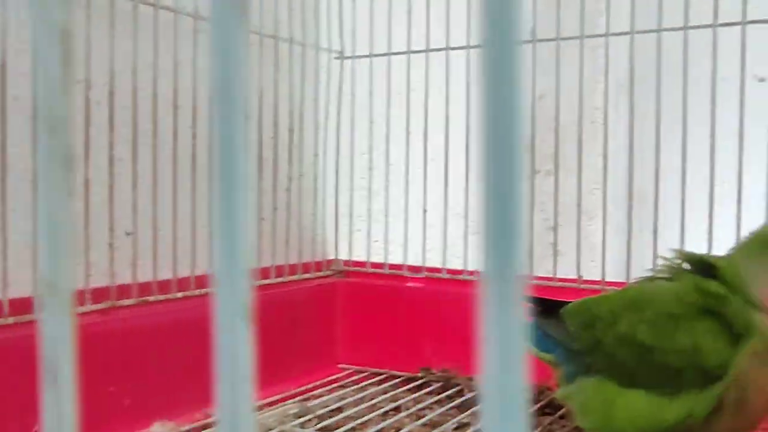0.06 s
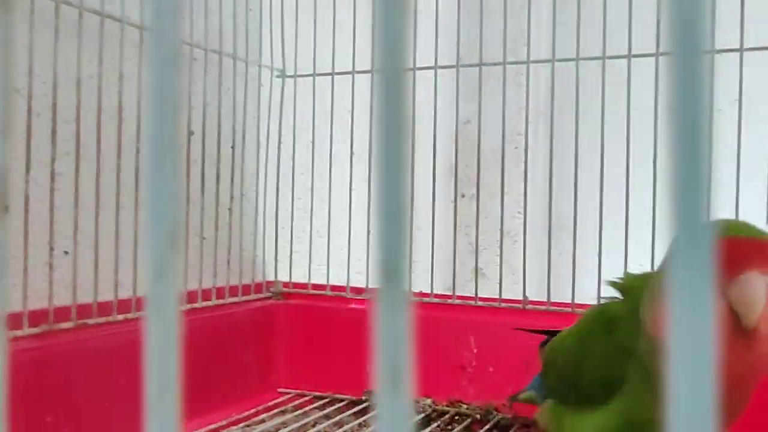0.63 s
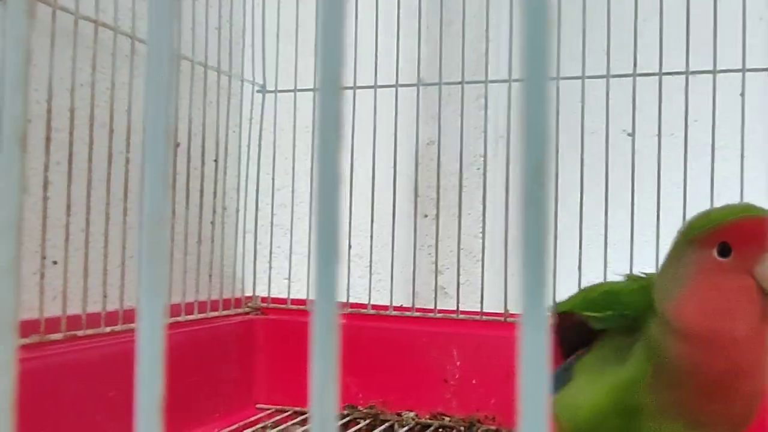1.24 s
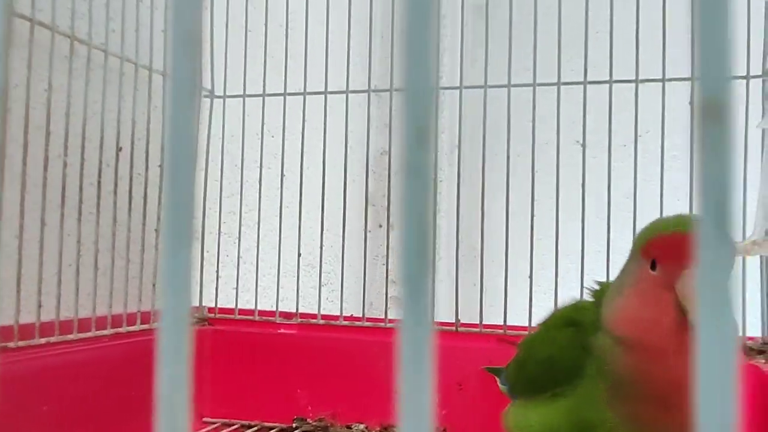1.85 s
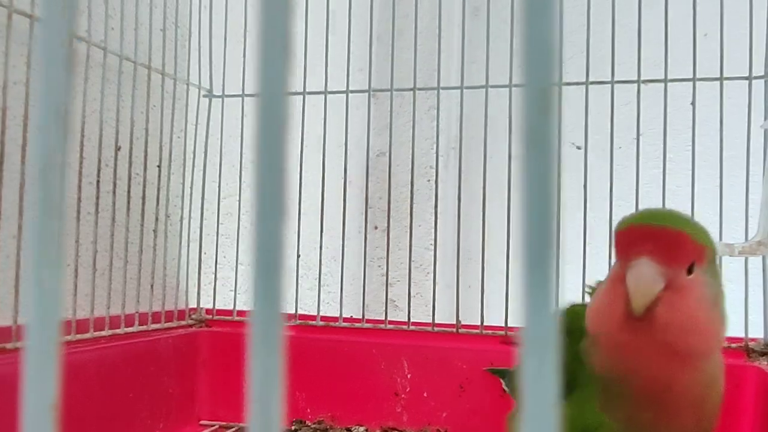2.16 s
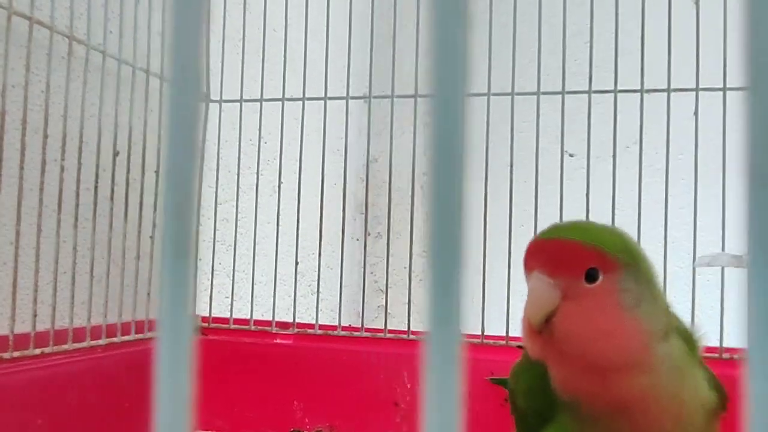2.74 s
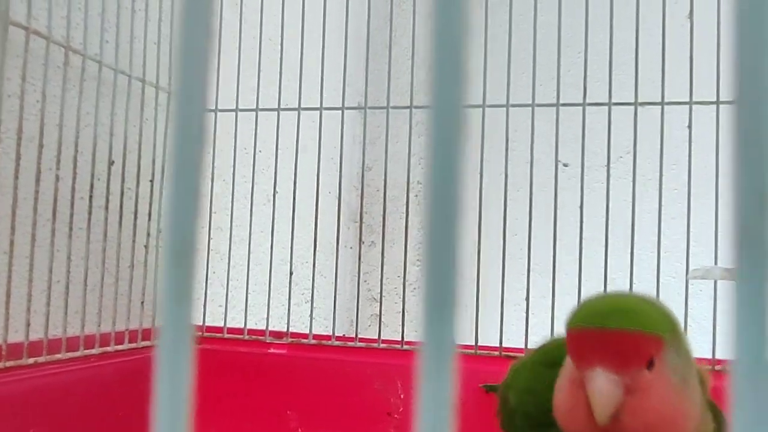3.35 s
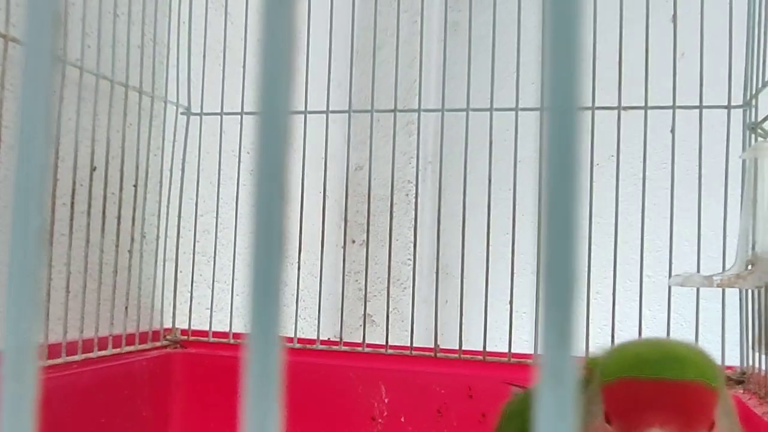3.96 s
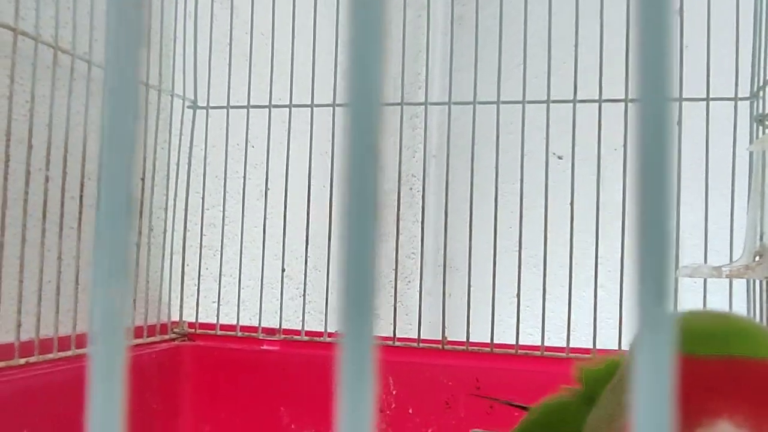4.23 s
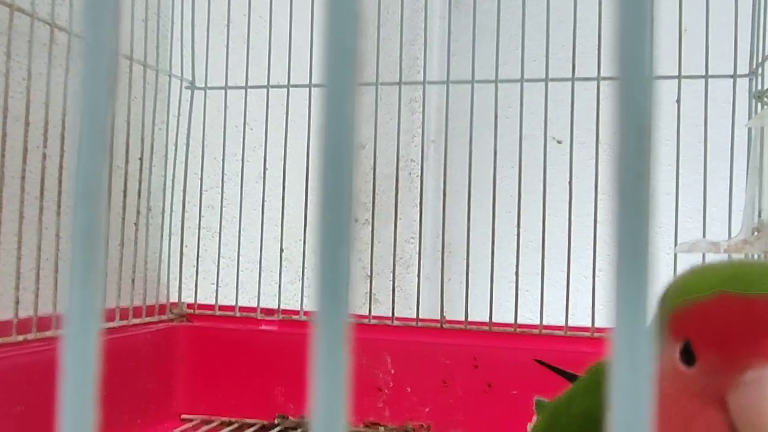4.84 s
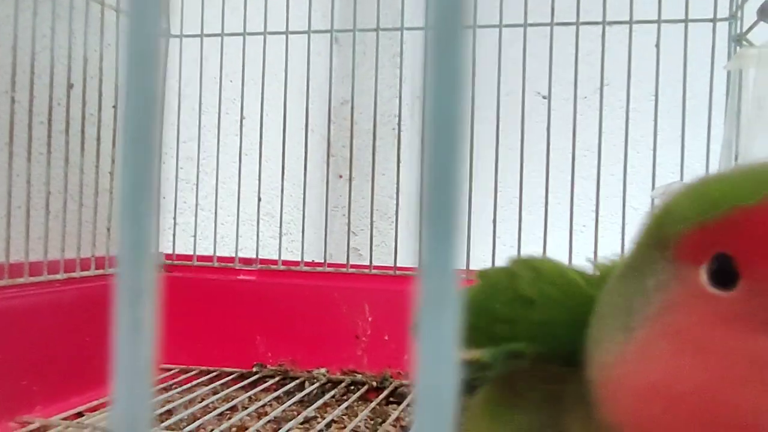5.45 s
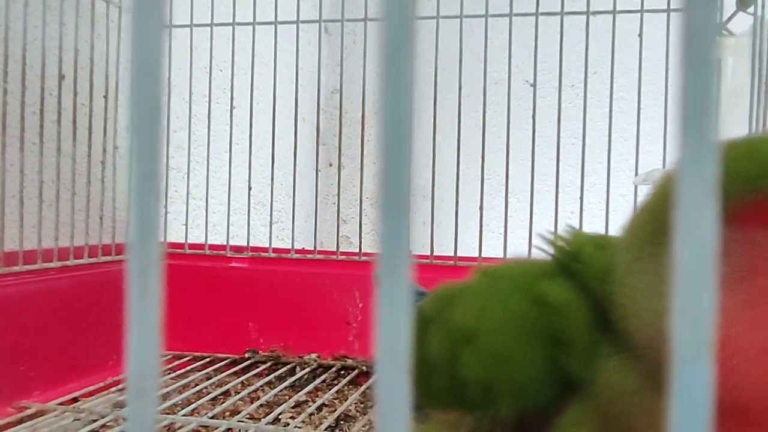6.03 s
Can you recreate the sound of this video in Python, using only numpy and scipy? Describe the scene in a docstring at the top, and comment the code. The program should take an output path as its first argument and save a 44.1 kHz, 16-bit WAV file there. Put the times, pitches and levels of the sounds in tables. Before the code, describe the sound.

A hard clack rings briefly on a wire cage. Right after it, a lovebird gives one loud, shrill two-syllable chirp very close to the microphone, slightly distorted, with a short echo from a hard-walled room. The rest is much quieter: the phone softly bumps and scuffs the bars, while claws tick on wire, small footfalls sound on a plastic tray and feathers rustle over a low rumble of air.

```python
"""A lovebird chirps at close range

A caged lovebird gives one shrill two-syllable chirp beside a phone, in a hard-walled room. In each
syllable its syrinx jumps from a rasp to a whistle; the call overloads the microphones and reverberates.
A clack comes just before it. Afterwards the phone bumps and scuffs the bars, while claws tick on the
wire, footfalls ring the tray and feathers rustle over a low rumble of air."""
import sys
import numpy as np
from scipy import signal
from scipy.fft import rfft, irfft, next_fast_len
from scipy.io import wavfile
from scipy.ndimage import uniform_filter1d, minimum_filter1d

SR = 44100
rng = np.random.default_rng(int(sys.argv[2]) if len(sys.argv) > 2 else 0)


def waveform_to_disk(signal):
    """Save audio, clipped to [-1, 1], as 16-bit WAV at the path in sys.argv[1]."""
    frames = np.transpose(np.atleast_2d(signal))
    scaled = np.clip(frames, -1, 1) * 32767
    samples = np.round(scaled).astype(np.int16)
    wavfile.write(sys.argv[1], SR, samples)


N = 268524
TIME = np.arange(N) / SR

# Reverberation time of the room: frequency_hz, t60_s
ROOM_DECAY = [(200, .45), (1000, .5), (2500, .53), (6000, .54), (9000, .46), (12500, .42), (16000, .35)]
# Ambient noise: frequency_hz, level_db
AIR_SPECTRUM = [(12, -28.5), (20, 10), (44, -12.5), (81, -10), (127, -16.5), (198, -19.5), (262, -24.5),
                (388, -26.5), (607, -30), (698, -29), (1290, -34.5), (5680, -45), (8890, -54), (13900, -43),
                (16000, -50.5)]
# Likeness of that noise at the two microphone ports: frequency_hz, correlation
AIR_COHERENCE = [(30, 0.31), (200, 0.33), (1000, .25), (8000, .05)]
# Movements of the bird: start_s, level_db, t60_s
SHUFFLE_EVENTS = [(.39, -56.5, 0.32), (1.219, -62.5, 4.4), (3.77, -58, 1.1), (4.209, -55, 0.97),
                  (4.99, -64.5, 0.68)]
# Rustle of feathers and litter: frequency_hz, level_db
SHUFFLE_SPECTRUM = [(80, -10.5), (150, 6), (260, -1), (480, 6.5), (900, -11), (1500, -10.5), (2600, -17),
                    (4200, -26), (8500, -36.5), (15000, -22)]
# Footfalls on the floor grid: start_s, level_db
FOOTFALLS = [(1.235, -56), (2.299, -65), (3.08, -66.5), (3.63, -57.5), (3.784, -58.5), (4.04, -59.5),
             (4.225, -63), (4.44, -59.5), (5.008, -59), (5.403, -69)]
# Resonances of the hollow plastic tray: frequency_hz, bandwidth_hz, gain_db
TRAY_MODES = [(148, 15, -2.5), (400, 19, 6.5), (512, 27, 5.5), (760, 53, -7), (1380, 290, -25)]
# Claws and beak on the wire: start_s, level_db, left_minus_right_db
WIRE_TAPS = [(0.394, -56.5, -4), (1.2343, -55, -7), (1.254, -55.5, -9), (1.345, -55.5, -10),
             (2.139, -51.5, -3.5), (2.267, -52, -5), (2.5386, -52.5, -2.5), (2.9699, -54.5, -0.5),
             (3.397, -50.5, -1), (4.042, -55.5, 3), (4.1344, -58, -2), (4.2262, -54.5, -9),
             (5.009, -51.5, -1), (5.0464, -58, -6), (5.402, -56, 0), (5.7009, -53, 1)]
# One such tap: frequency_hz, level_db
TAP_SPECTRUM = [(300, -2), (1000, -1), (2200, 0), (3500, -3.5), (6000, -2), (8500, -9.5), (12000, -7.5),
                (16000, 0)]
# Cage parts ringing after a knock: start_s, pitch_hz, level_db, t60_s
CAGE_RINGS = [(0.103, 375, -53.5, 0.78), (0.104, 1058, -40, 0.39), (0.106, 1794, -38.5, 0.52),
              (3.464, 3810, -67, 0.4), (3.786, 2480, -58, 0.125)]
# The phone's case slides along a bar: start_s, length_s, hiss_db, grating_db
CASE_SLIDES = [(1.479, .018, -61, -56.5), (1.582, 0.018, -57.5, -61), (1.594, 0.036, -67.5, -61.5),
               (1.652, 0.068, -52.5, -69), (1.708, 0.066, -51.5, -59), (1.825, 0.023, -54.5, -46.5),
               (3.463, 0.032, -59, -55), (3.544, 0.012, -61.5, -55), (3.713, 0.035, -55.5, -48)]
# Fine slips in a slide: frequency_hz, level_db
HISS_SPECTRUM = [(1000, 1), (2500, -2.5), (6500, -5), (8500, -12.5), (11000, -3.5), (13500, 1.5),
                 (16000, 3)]
# Coarse slips in a slide: frequency_hz, level_db
GRATING_SPECTRUM = [(80, 19.5), (200, 16), (500, 14.5), (1000, 4), (2500, -7.5), (6000, -16), (12000, -21)]
# The case bumps the bars: start_s, thud_db, click_db, cutoff_hz
CASE_IMPACTS = [(0.037, -53, -43, 1070), (0.665, -35, -68, 1500), (0.703, -55, -65, 800),
                (1.022, -43, -72.5, 510), (1.029, -42, -71, 498), (1.037, -45.5, -70, 500),
                (1.16, -41, -67, 605), (1.171, -41.5, -60, 810), (1.348, -48.5, -69, 900),
                (1.4882, -36.5, -29.5, 1300), (1.583, -36, -56, 900), (1.6588, -39, -56, 1300),
                (1.8206, -41, -18.5, 3440), (3.464, -47, -40, 4900), (3.5475, -40, -36, 2800),
                (3.6127, -40, -30, 1480), (3.7149, -46.5, -31.5, 9180)]
# Modes of the case: frequency_hz, level_db, t60_s
CASE_MODES = [(86, -16, 0.043), (180, -5.5, 0.0217), (288.6, -1, 0.0195), (426, -19, 0.0089)]
# Response of a port to sound carried through the case: frequency_hz, gain_db
PORT_RESONANCE = [(500, -0.5), (1200, 5), (3000, -0.5), (6000, -3), (8500, -12), (12500, 6), (16000, 15)]
# A hard clack across the room: frequency_hz, level_db
CLACK_SPECTRUM = [(150, -50.5), (250, -24.5), (367, -10), (510, -23), (547, -19.5), (1010, -7), (1400, -7),
                  (1790, -1), (1950, -4.5), (6470, -14), (8400, -24.5), (16000, -23)]
# Turbulence in the bird's throat: frequency_hz, level_db
BREATH_SPECTRUM = [(1000, -41), (2000, -32.5), (2400, -8.5), (3000, -14), (3900, -20), (4800, -7.5),
                   (5500, -16), (6200, -4.5), (7200, -17.5), (8200, -20.5), (9800, -10.5), (11100, -11),
                   (12500, 6.5), (15500, -8.5)]
# Rasp that opens each syllable: start_s, length_s, pitch_hz, level_db, release_db_per_s
RASP_NOTES = [(0.461, .018, 2175, -1.5, 901), (0.533, .008, 2355, -7.5, 352)]
# Whistle that ends each syllable: start_s, length_s, pitch_hz, level_db
WHISTLE_NOTES = [(0.477, .052, 6413, -1.5), (0.539, 0.033, 6181, 6.5)]
# Reflections from surfaces near the bird: left_delay_ms, right_delay_ms, gain_db
EARLY_REFLECTIONS = [(1.13, 1.62, -12), (2.9, 4.4, -8.5), (5.399, 6.7, -6)]
# Radiation into the room relative to that aimed at the phone: frequency_hz, gain_db
ROOM_RADIATION = [(1500, -8.5), (2400, 0), (3200, -6.5), (4800, -1), (5500, -5.5), (6200, -6), (7300, -8),
                  (9700, -2.5), (11100, -2.5), (12500, -6.5), (14000, -6), (16000, -14)]
# Response of the right port relative to the left: frequency_hz, gain_db
RIGHT_PORT_RESPONSE = [(2000, -2), (6300, 1.5), (9500, 5), (12500, 3.5), (16000, 2.5)]


def undb(db):
    """Decibels to amplitude ratio."""
    return 10 ** (np.asarray(db) / 20)


def unit(x):
    """Normalisation to rms 1."""
    return x / np.sqrt(np.mean(x ** 2))


def at_bins(curve, size):
    """Log-frequency interpolation of a curve at the bins of a spectrum."""
    hz, value = np.transpose(curve)
    bin_hz = np.arange(size // 2 + 1) * SR / size
    return np.interp(np.log(bin_hz + 1), np.log(hz), value)


def colour(x, curve):
    """Zero-phase filtering by a curve of frequency_hz, gain_db."""
    size = next_fast_len(N)
    return irfft(rfft(x, size) * undb(at_bins(curve, size)), size)[..., :N]


def noise(spectrum):
    """Coloured noise of rms 1, uncorrelated left and right."""
    return unit(colour(rng.standard_normal((2, N)), spectrum))


def butter(x, hz, kind="low", order=2):
    """Causal low- or high-pass filtering."""
    return signal.sosfilt(signal.butter(order, hz, kind, fs=SR, output="sos"), x)


def wander(hz):
    """Random modulation: low-passed noise of rms 1."""
    return unit(butter(rng.standard_normal(N), hz))


def pan(db):
    """Gains for a level difference, left minus right."""
    return undb(np.array([[db], [-db]]) / 2)


def delay(x, ms):
    """Propagation delay."""
    return np.interp(TIME - ms / 1000, TIME, x)


def phase_of(hz):
    """Phase as the integral of frequency."""
    return 2 * np.pi * np.cumsum(hz) / SR


def fade(start, t60):
    """Exponential decay from a sudden onset."""
    return (TIME >= start) * undb(-60 * np.maximum(TIME - start, 0) / t60)


def rise(start, rise_s):
    """Linear onset from 0 to 1."""
    return np.clip((TIME - start) / rise_s, 0, 1)


def note(start, length, attack_s, release_db_per_s):
    """Envelope of attack, hold and exponential release."""
    return rise(start, attack_s) * undb(-release_db_per_s * np.maximum(TIME - start - length, 0))


def reverberation(x, build_s=.016):
    """A diffuse field builds up, then decays by absorption, the high treble first."""
    hz, age, cells = signal.stft(rng.standard_normal((2, SR)), SR, nperseg=256)
    t60 = np.interp(hz, *np.transpose(ROOM_DECAY))[:, None]
    envelope = undb(-60 * age / t60) * (1 - np.exp(-age / build_s))
    tail = signal.istft(cells * envelope, SR)[1]
    response = unit(tail) / np.sqrt(tail.shape[1])
    return signal.fftconvolve(np.atleast_2d(x), response, axes=1)[:, :N]


def air(level_db=-54.5, swell_db=1):
    """Partial coherence: ambient rumble is more alike at the two ports than the faint hiss is."""
    size = next_fast_len(N)
    coherence = at_bins(AIR_COHERENCE, size)
    weights = np.sqrt([1 + coherence, 1 - coherence])
    mid, side = irfft(rfft(noise(AIR_SPECTRUM), size) * weights, size)[:, :N]
    ambience = np.array([mid + side, mid - side]) / np.std(mid)
    return ambience * undb(level_db + swell_db * wander(2))


def shuffles(rise_s=.022, fidget_db=-71):
    """Friction noise of feathers and litter: each movement adds in power to a constant faint fidget."""
    moves = sum(undb(db) * fade(start, t60) * rise(start, rise_s) for start, db, t60 in SHUFFLE_EVENTS)
    return pan(2) * noise(SHUFFLE_SPECTRUM) * np.hypot(moves, undb(fidget_db))


def steps(t60=.488, rise_s=.0093):
    """Resonance: light footfalls excite the modes of the hollow tray."""
    scrape = rng.standard_normal((2, N))
    tray = sum(undb(db) * signal.lfilter(*signal.iirpeak(hz, hz / width, SR), scrape)
               for hz, width, db in TRAY_MODES)
    return unit(tray) * sum(undb(db) * fade(start, t60) * rise(start, rise_s) for start, db in FOOTFALLS)


def ticks(t60=.034, room_db=-6):
    """Impact noise: claws and beak tap the wire in short broadband bursts."""
    envelope = sum(pan(pan_db) * undb(db) * fade(start, t60) for start, db, pan_db in WIRE_TAPS)
    taps = noise(TAP_SPECTRUM) * envelope
    return taps + undb(room_db) * reverberation(taps)


def pings(split=.029):
    """Beating: a struck wire swings in two planes at slightly different frequencies."""
    out = np.zeros((2, N))
    for start, hz, db, t60 in CAGE_RINGS:
        for ratio in (1 - split / 2, 1 + split / 2):
            phase = 2 * np.pi * hz * ratio * TIME + rng.uniform(0, 2 * np.pi, (2, 1))
            out += undb(db) * fade(start, t60) * np.sin(phase) / 2
    return out


def scuffs(grain_db=3, spread=.83, pan_db=-26.5):
    """Sliding friction of case on bar: a hiss of fine slips over a coarser grating."""
    hiss, grating = (unit(n[0] + spread * n) for n in (noise(HISS_SPECTRUM), noise(GRATING_SPECTRUM)))
    out = np.zeros((2, N))
    for start, length, hiss_db, grating_db in CASE_SLIDES:
        span = slice(int(start * SR), int((start + length) * SR))
        pressure = np.sin(np.linspace(0, np.pi, span.stop - span.start))
        friction = undb(hiss_db) * hiss[:, span] + undb(grating_db) * grating[:, span]
        out[:, span] += pan(pan_db) * pressure * friction
    return out * unit(undb(grain_db * wander(600)))


def bumps(detune=.74, pan_db=-20.5):
    """Structure-borne sound: a pulse and the case's damped modes, struck beside the right port."""
    out = np.zeros((2, N))
    age = TIME[:4096]
    for start, thud_db, click_db, cutoff_hz in CASE_IMPACTS:
        grip = 1 + detune * rng.uniform(-.69, 1, (2, 1))  # the hand detunes each end of the case
        modes = sum(undb(db - 60 * age / t60) * np.sin(2 * np.pi * hz * grip * age)
                    for hz, db, t60 in CASE_MODES)
        thud = butter(modes, cutoff_hz)  # a soft contact rounds the thud too
        click = butter(1. * (age == 0), cutoff_hz, order=1)
        first = int(start * SR)
        out[:, first:first + len(age)] += pan(pan_db) * (2 * undb(click_db) * click - undb(thud_db) * thud)
    return colour(out, PORT_RESONANCE)


def clack(start=.1045, level_db=-12.5, direct_db=-21, room_db=-16):
    """Direct and reverberant sound of a hard impact across the room."""
    blow = noise(CLACK_SPECTRUM) * undb(level_db)
    direct = blow * fade(start, t60=.46)
    reflected = reverberation(blow * fade(start, t60=.023), build_s=.0012)
    return pan(1) * (undb(direct_db) * direct + undb(room_db) * reflected)


def rasp(start, length, pitch_hz, level_db, release_db_per_s, climb_hz_per_s=13000, jitter=.022, flutter=.3):
    """Source and filter: the syrinx vibrates unsteadily and the throat favours harmonics 2 and 3."""
    hz = pitch_hz + climb_hz_per_s * np.clip(TIME - start, 0, length)
    call_age = np.maximum(TIME - RASP_NOTES[0][0], 0)
    third_db = np.minimum(-20 + 2001 * call_age, .5)  # takes over as the beak opens
    waver = .014 * wander(150)
    phase = phase_of(hz * (1 + jitter * wander(500) + waver))
    tone = undb(-16) * np.sin(phase) + np.sin(2 * phase) + undb(third_db) * np.sin(3 * phase)
    tone += undb(-18) * np.sin(4 * phase) + undb(-14) * np.sin(6 * phase)
    puff = undb(-4) * fade(start, t60=.028)  # the air that sets the rasp going
    breath = (undb(-18) + puff) * noise(BREATH_SPECTRUM)[0]
    envelope = undb(level_db) * note(start, length, attack_s=.0013, release_db_per_s=release_db_per_s)
    return envelope * (tone * (1 + flutter * wander(500)) + breath)


def whistle(start, length, pitch_hz, level_db, overshoot_hz=301, settle_s=.003, sag_hz_per_s=1700,
            rough_start=.95, rough_end=.12, clearing_s=.034, jitter=.02, flutter=.24):
    """Random frequency and amplitude modulation roughen a near-sine that starts sharp, clears and sags."""
    age = np.maximum(TIME - start, 0)
    hz = pitch_hz + overshoot_hz * np.exp(-age / settle_s) - sag_hz_per_s * np.minimum(age, length)
    roughness = rough_end + (rough_start - rough_end) * np.exp(-age / clearing_s)
    waver = .014 * wander(130)
    tremble = undb(1.4 * wander(120))
    phase = phase_of(hz * (1 + jitter * roughness * wander(700) + waver))
    tone = np.sin(phase) + undb(-14) * np.sin(2 * phase)
    tone *= tremble * (1 + flutter * roughness * wander(430))
    breath = undb(-10) * roughness * noise(BREATH_SPECTRUM)[0]
    envelope = undb(level_db) * note(start, length, attack_s=.0041, release_db_per_s=1101.5)
    return envelope * (tone + breath)


def chirp(near_db=1, room_db=-13, port_lag_ms=.09):
    """Multipath propagation: the call arrives directly, off nearby surfaces, then from the walls."""
    call = sum(rasp(*row) for row in RASP_NOTES) + sum(whistle(*row) for row in WHISTLE_NOTES)
    left = call + sum(undb(db) * delay(call, ms) for ms, _, db in EARLY_REFLECTIONS)
    right = delay(call, port_lag_ms) + sum(undb(db) * delay(call, ms) for _, ms, db in EARLY_REFLECTIONS)
    diffuse = reverberation(colour(call, ROOM_RADIATION), build_s=.043)
    left, right = undb(near_db) * np.array([left, right]) + undb(room_db) * diffuse
    return np.array([left, colour(right, RIGHT_PORT_RESPONSE)])


def scene():
    """Superposition of bird, phone, cage and room."""
    return chirp() + clack() + bumps() + scuffs() + pings() + ticks() + steps() + shuffles() + air()


def limiter(x, threshold=.73, release_db_per_s=85):
    """Peak limiting: the gain drops at once on a peak and creeps back."""
    over_db = 20 * np.log10(np.maximum(np.abs(x).max(axis=0) / threshold, 1))
    recovery = release_db_per_s * TIME
    cut_db = np.maximum.accumulate(over_db + recovery) - recovery
    return x * uniform_filter1d(minimum_filter1d(undb(-cut_db), size=65), size=65)


def record(dry, positive_limit=1., negative_limit=5.5, sag=.28, sag_hz=28, low_hz=2.7, top_hz=16000):
    """Asymmetric saturation in the microphones adds overtones and a slow heave; the limiter then ducks."""
    limit = np.where(dry > 0, positive_limit, negative_limit)
    bent = limit * np.tanh(dry / limit)
    bent -= sag * butter(np.tanh(8 * dry ** 2) ** 2, sag_hz)  # the bias sags under a loud sound
    limited = limiter(butter(bent, low_hz, "high", order=3))
    return signal.sosfilt(signal.ellip(10, .2, 80, top_hz, fs=SR, output="sos"), limited)


dry = scene()
out = record(dry)
waveform_to_disk(out)
```